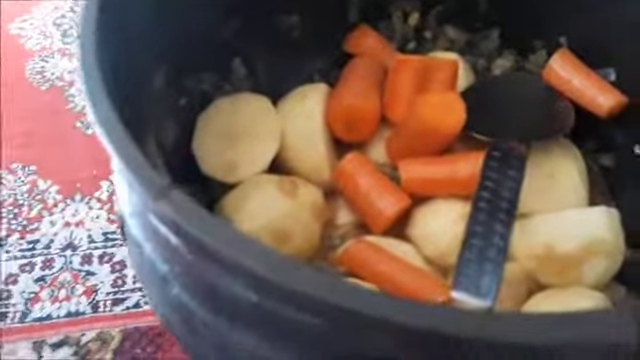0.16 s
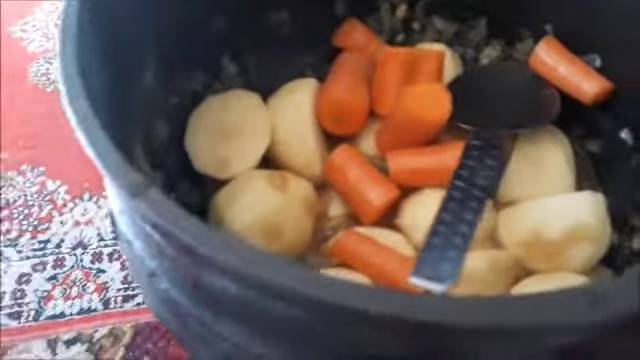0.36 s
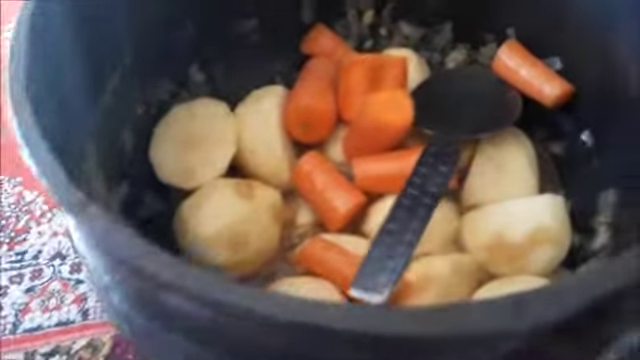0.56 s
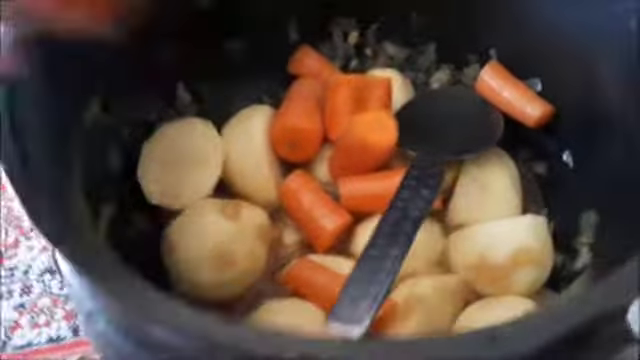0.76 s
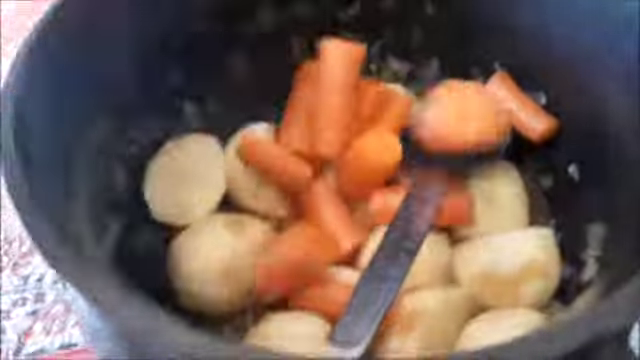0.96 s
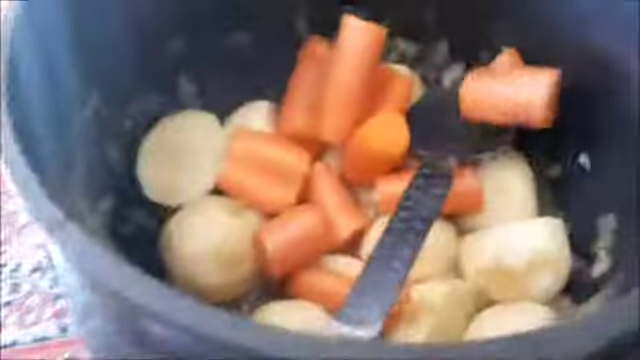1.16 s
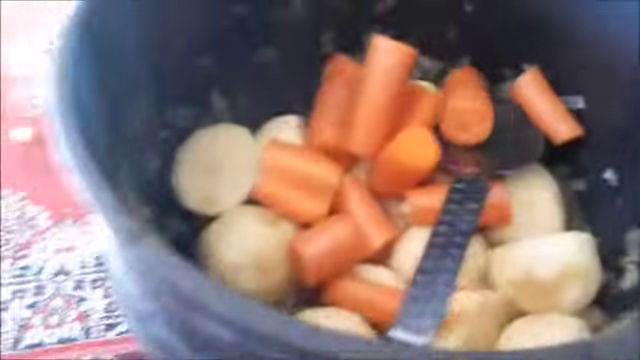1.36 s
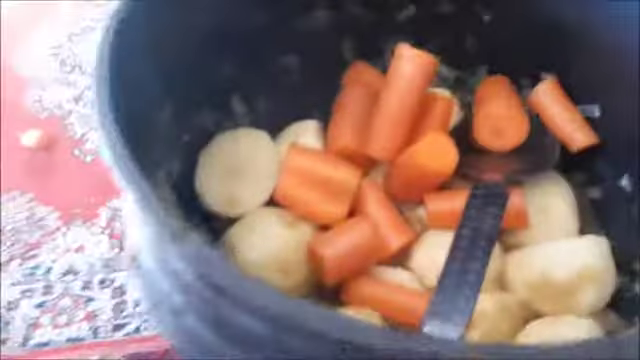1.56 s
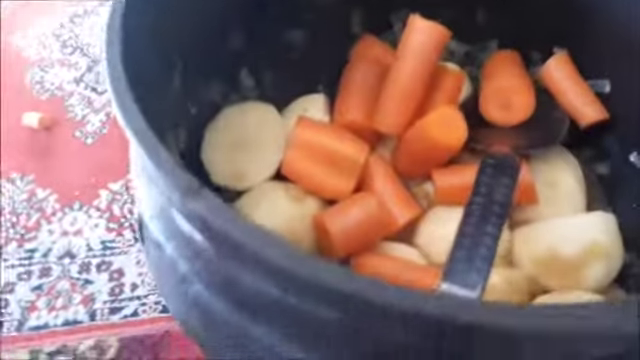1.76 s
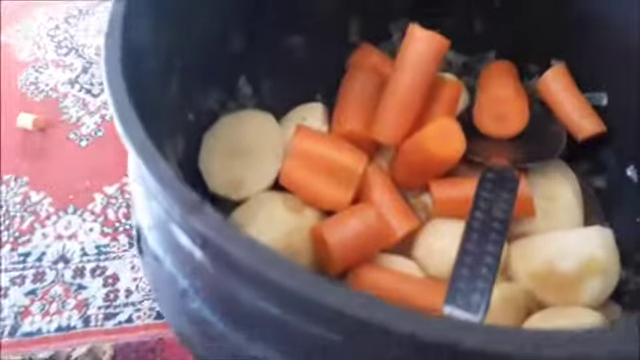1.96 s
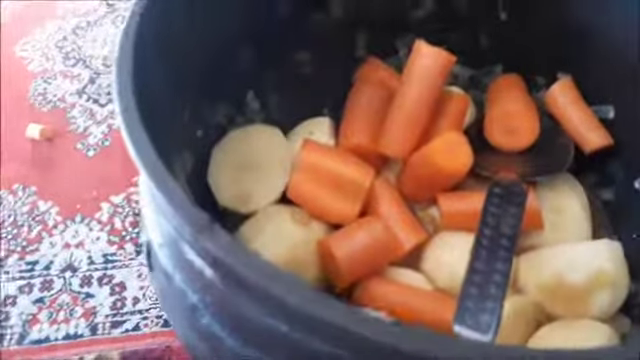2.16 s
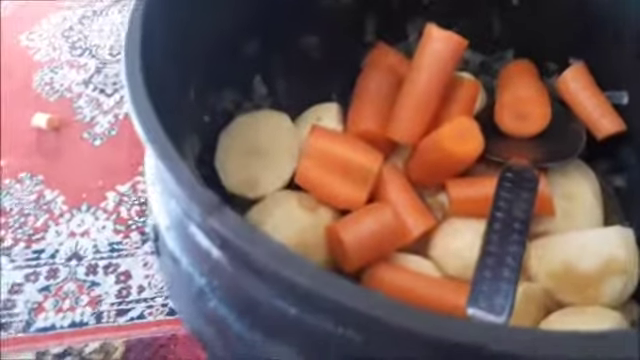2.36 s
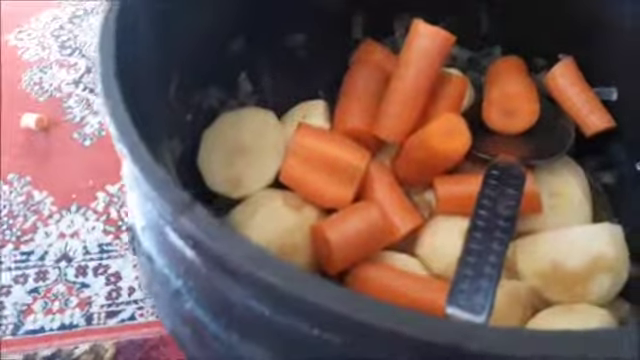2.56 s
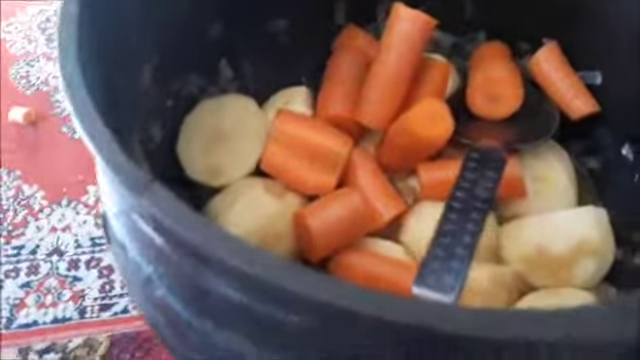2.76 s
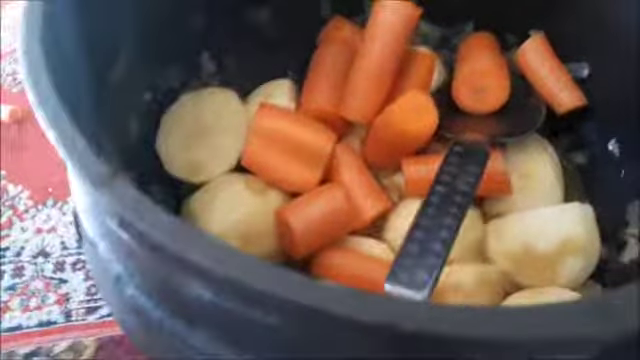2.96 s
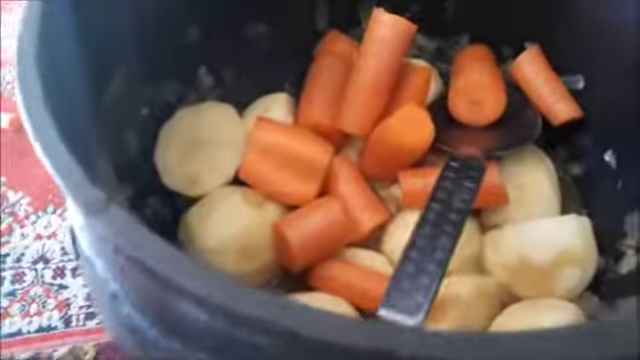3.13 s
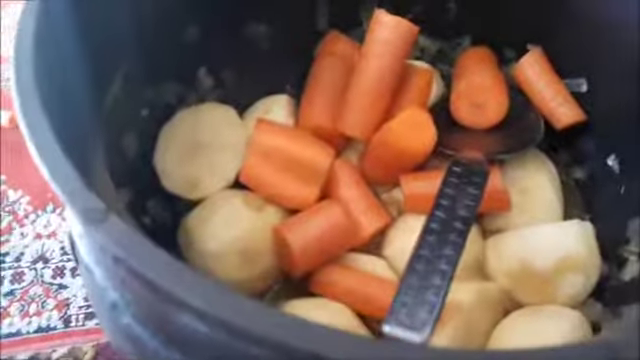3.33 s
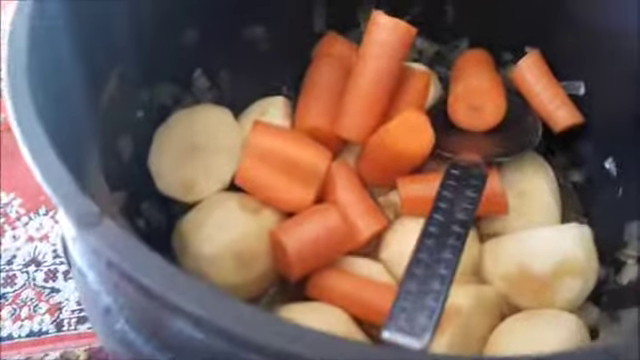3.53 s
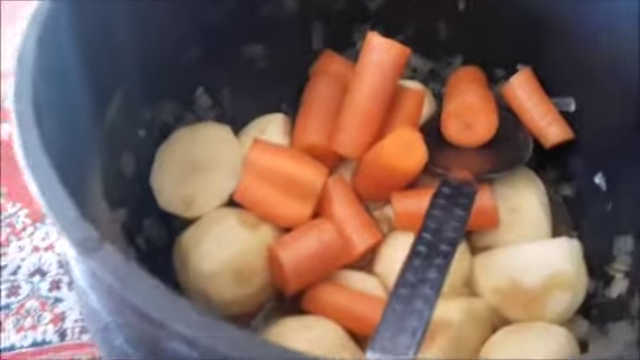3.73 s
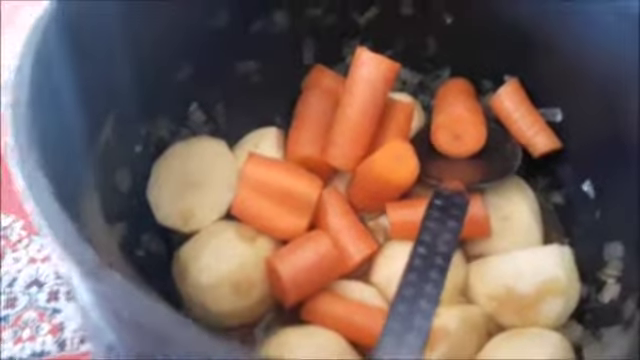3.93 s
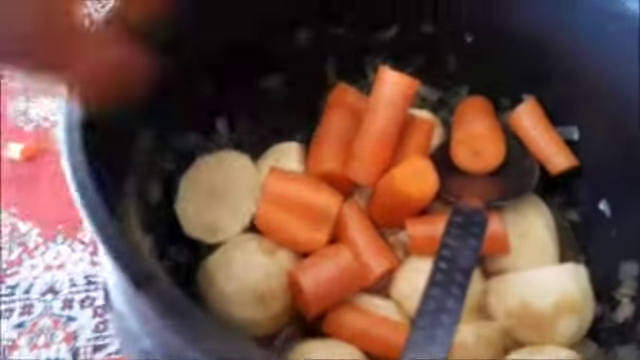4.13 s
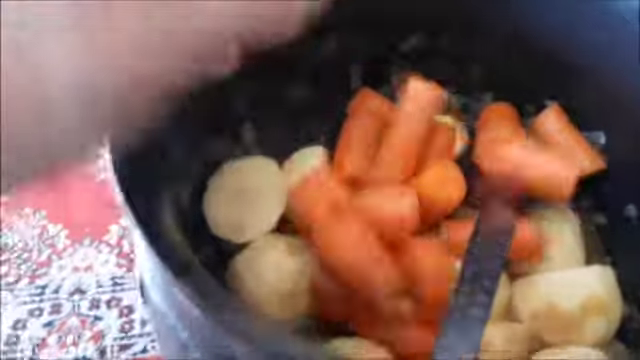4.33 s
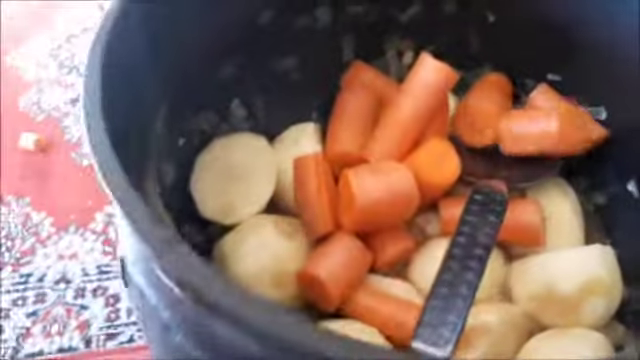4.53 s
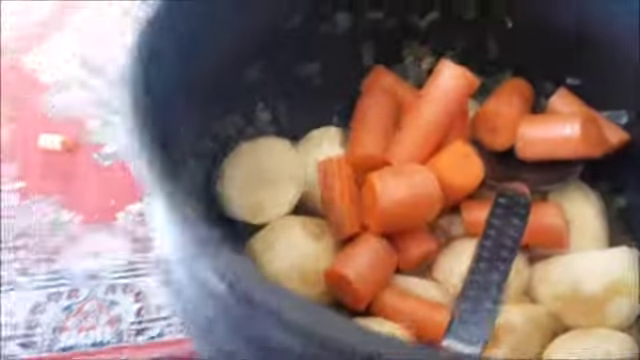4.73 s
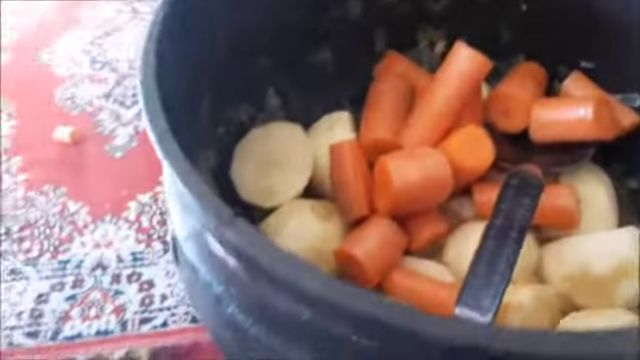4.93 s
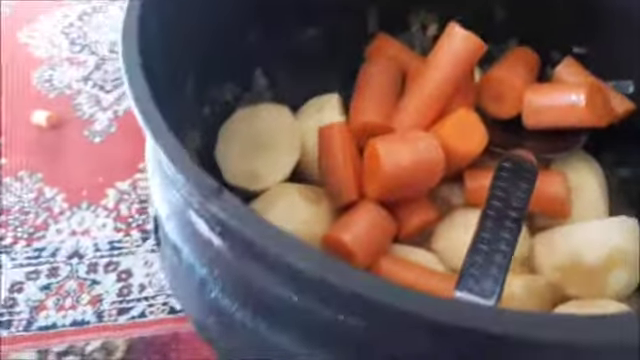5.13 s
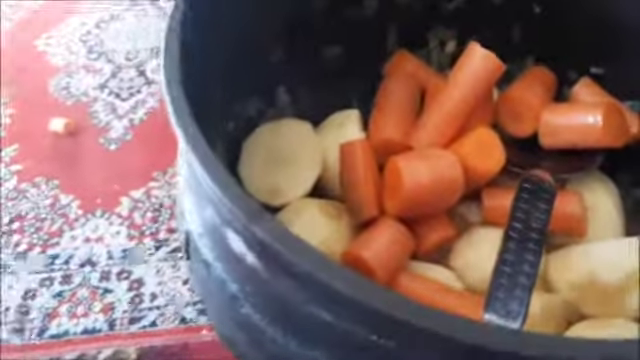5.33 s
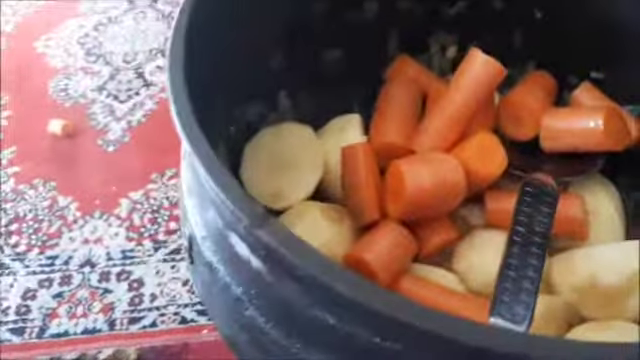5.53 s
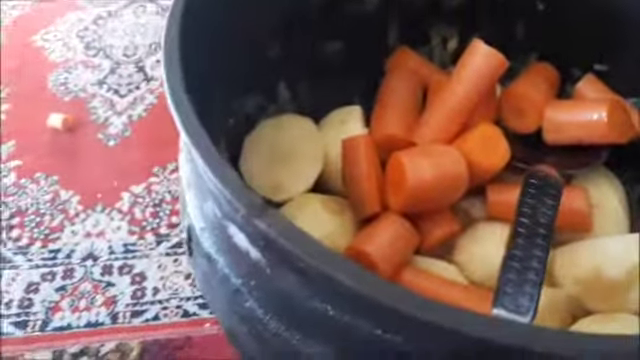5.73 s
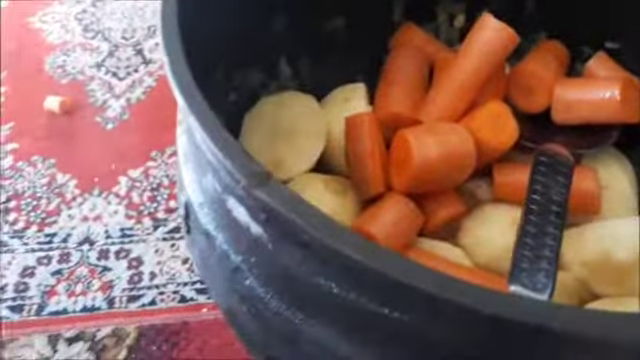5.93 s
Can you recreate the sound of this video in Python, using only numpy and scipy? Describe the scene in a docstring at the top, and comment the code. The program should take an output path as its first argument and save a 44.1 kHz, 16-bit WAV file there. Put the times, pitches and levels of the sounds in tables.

```python
"""A quiet yard opens the scene: steady airy hiss, muffled handling knocks and faint birds.
Then two handfuls of carrot chunks fall into a cast iron pot, onto potatoes and a metal spoon.
Chunks land with a dull thud of shaped noise; the spoon rattles on the iron as a burst of dense modes,
and the iron rings briefly as decaying sines. Faint sliding hiss follows the first handful.
The recorder's gain control drops at each clatter and lets the level creep back."""
import sys
import numpy as np
from scipy import signal
from scipy.fft import rfft, irfft
from scipy.io import wavfile
from scipy.ndimage import uniform_filter1d

SR = 44100
rng = np.random.default_rng(int(sys.argv[2]) if len(sys.argv) > 2 else 0)


def dump(signal):
    """Clip the signal to [-1, 1] and save it as 16-bit WAV at the path in sys.argv[1]."""
    limited = np.clip(np.atleast_2d(signal).T, -1, 1)
    pcm = np.round(limited * 32767).astype(np.int16)
    wavfile.write(sys.argv[1], SR, pcm)


N = 268569


def from_db(db):
    """Decibels to gain."""
    return 10 ** (np.asarray(db) / 20)


def unit(x):
    """Scales to an rms of 1."""
    return x / np.sqrt(np.mean(x ** 2) + 1e-20)


def spectrum(points, hz):
    """Reads (Hz, value) points on a log-frequency axis."""
    point_hz, value = np.transpose(points)
    return np.interp(np.log(hz + 1), np.log(point_hz), value)


def bell(hz, centre_hz, width_hz):
    """A smooth hump of height 1."""
    return np.exp(-((hz - centre_hz) / width_hz) ** 2)


def noise(size, colour):
    """Noise of rms 1 whose spectrum follows the gain colour(Hz)."""
    white = rfft(rng.standard_normal(size))
    return unit(irfft(white * colour(np.fft.rfftfreq(size, 1 / SR)), size))


def fade(t, rise_s, t60_s):
    """Builds up, then dies by 60 dB in t60_s."""
    return (1 - np.exp(-t / rise_s)) * from_db(-60 * t / t60_s)


def add(mix, start_s, sound):
    """Mixes a sound in at its start time."""
    part = mix[max(round(start_s * SR), 0):][:len(sound)]
    part += sound[:len(part)]


# broad colour of the yard air: frequency_hz, relative_level_db
YARD_COLOUR = [(25, -30.5), (60, -14), (102, -10.5), (250, 1), (363, -1.5), (520, -8.5), (1100, -7.5),
               (1300, -11.5), (2760, -16.5), (4300, -21.5), (7700, -27), (9900, -34), (13600, -30),
               (16000, -26.5)]
# narrow humps of hiss on top: centre_hz, half_width_hz, boost_db
YARD_HUMPS = [(369.4, 35, 7), (647, 64, -3.5), (2100, 66, 6), (3750, 230, 14), (8636, 450, 17.5),
              (9870, 420, -11)]


def yard(level_db=-52, waver_db=1.36):
    """Steady outdoor air: coloured noise with narrow humps, its level wavering a little."""
    def colour(hz):
        humps_db = sum(db * bell(hz, centre, width) for centre, width, db in YARD_HUMPS)
        return from_db(spectrum(YARD_COLOUR, hz) + humps_db)
    air = noise(N, colour)
    waver = noise(N, lambda hz: bell(hz, 0, 6.8))  # slow random drift
    return air * from_db(level_db + waver_db * waver)


# small knocks of handling: start_s, level_db (before the fade), t60_s, pitch_hz, pitch_boost_db
HANDLING_KNOCKS = [(0.042, -43, 0.36, 1670, 17.5), (0.068, -43.5, 0.67, 2120, 2),
                   (0.3821, -39, 0.039, 1800, 10), (0.395, -38, .25, 274, 12.5),
                   (0.795, -47, 0.36, 1673, 5), (0.943, -37.5, 0.045, 1144, 22.5),
                   (2.699, -48, .15, 905, 5), (5.981, -49, 0.59, 690, 6)]
# muffled colour shared by the knocks: frequency_hz, relative_level_db
KNOCK_COLOUR = [(40, -21), (130, -11.5), (210, -4), (320, 2), (430, -7), (650, -8.5), (1700, -17.5),
                (3000, -22.5), (9000, -28.5), (15000, -50)]


def bumps(width_hz=170, tick_share=.1, rise_share=0.013):
    """Muffled knocks of handling: noise with one soft resonance and a brief tick where it starts."""
    out, t = np.zeros(N), np.arange(SR // 2) / SR
    for start_s, level_db, t60_s, pitch_hz, boost_db in HANDLING_KNOCKS:
        def colour(hz):
            return from_db(spectrum(KNOCK_COLOUR, hz) + boost_db * bell(hz, pitch_hz, width_hz))
        rise_s = rise_share * t60_s  # longer knocks build up more slowly
        tick = .5 * fade(t, rise_s, t60_s * tick_share)
        add(out, start_s, from_db(level_db) * noise(len(t), colour) * (fade(t, rise_s, t60_s) + tick))
    return out


# far birds: start_s, length_s, mid_call_pitch_hz, level_db (at the top of the swell)
BIRD_CALLS = [(0.145, 0.11, 6430, -60), (0.742, 0.085, 4190, -57.5), (0.79, 0.11, 4850, -64),
              (1.47, .08, 5200, -56), (1.526, 0.087, 3960, -55), (1.61, .08, 5990, -62),
              (1.69, 0.087, 5000, -62.5), (1.775, 0.16, 8750, -57.5), (2.609, 0.33, 8970, -44.5),
              (2.711, 0.28, 8800, -46)]


def birds(blur_hz=290, sag_hz_per_s=394):
    """Short tones that sink in pitch, blurred into narrow bands by distance."""
    out = np.zeros(N)
    for start_s, length_s, pitch_hz, level_db in BIRD_CALLS:
        t = np.arange(int(length_s * SR)) / SR
        sinking_hz = pitch_hz - sag_hz_per_s * (t - length_s / 2)
        tone = np.sin(2 * np.pi * np.cumsum(sinking_hz) / SR)
        blurred = unit(tone * noise(len(t), lambda hz: bell(hz, 0, blur_hz)))
        swell = np.sin(np.pi * t / length_s)
        add(out, start_s, from_db(level_db) * blurred * swell)
    return out


def thud(t, level_db):
    """Firm flesh on firm flesh: a short low knock, then a soft boom of the air in the pot."""
    # only heavy chunks reach the bass: softer landings raise the corner
    corner_hz = 120 * from_db(np.clip(-14 - level_db, -10, 10))
    knock = noise(len(t), lambda hz: bell(hz, 330, 340) * hz ** 2 / (hz ** 2 + corner_hz ** 2))
    knock = knock * fade(t, 0.0016, .025)
    boom = noise(len(t), lambda hz: bell(hz, 290, 145)) * fade(t, 0.0082, .16)
    return from_db(level_db) * (knock + from_db(-16) * boom)


# crowds of short-lived modes in the hollow of the pot: centre_hz, half_width_hz, relative_level_db
MODE_CROWDS = [ (424, 91, -9.5), (807, 60, -15.5), (1377, 110, -3.5), (2026, 464, 2), (3690, 440, -0.5),
               (4363, 250, -2), (5350, 580, 1.5), (6300, 510, 0), (7850, 170, -4.5), (8656, 340, 7.5),
               (10020, 460, -1.5), (10700, 260, -5.5), (11960, 350, 2.5), (14000, 870, -3),
               (14700, 410, -13), ]


def hollow(hz, base_db=-17, knee_hz=1400):
    """Colour of the metal heard inside the pot; a small spoon radiates little bass."""
    spoon = from_db(base_db) * hz ** 2 / (hz ** 2 + knee_hz ** 2)
    return spoon + sum(from_db(db) * bell(hz, centre, width) for centre, width, db in MODE_CROWDS)


# how fast the clatter dies, before each blow's linger scales it: frequency_hz, t60_s
CLATTER_DECAY = [(300, 0.29), (1500, 0.17), (4000, 0.14), (9000, 0.12), (15000, 0.1)]


def clatter(t, spot, linger, uneven_db=6.5, patch_hz=420, rise_s=0.0013):
    """Dense modes that die fast; each blow feeds some regions more than others."""
    grid_hz = np.arange(0, SR / 2, patch_hz)
    patches_db = uneven_db * rng.standard_normal(len(grid_hz))

    def colour(hz):
        return spot(hz) * hollow(hz) * from_db(np.interp(hz, grid_hz, patches_db))
    # each frequency band decays at its own rate
    hz, at_s, bands = signal.stft(noise(len(t), colour), SR, nperseg=256)
    t60_s = linger * spectrum(CLATTER_DECAY, hz)[:, None]
    bands = bands * from_db(-60 * at_s / t60_s)
    return signal.istft(bands, SR, nperseg=256)[1][:len(t)] * (1 - np.exp(-t / rise_s))


# clear modes of the pot and spoon: pitch_hz, relative_level_db, t60_s
METAL_MODES = [ (485, -29, .6), (861, -22, .17), (1290, -23, .48), (1325, -15, .28), (2110, -14, .2),
               (2386, -12.5, .5), (3079, -18, .19), (3542, -14, .19), (3700, -16, .2), (4533, -9, .21),
               (5116, -4.5, .16), (5511, -4, .145), (5687, -9, .155), (6244, -13, .2), (6780, -12, .18),
               (7765, -12, .2), (7913, -15, .18), (8131, -14, .17), (8440, -7.5, .22), (8490, -9, .19),
               (8748, -12, .17), (8880, -5, .15), (9991, -10, .16), (10862, -9, .16), (11946, -6.5, .14),
               (12766, -11, .12), (13628, -12, .125), (14008, -9.5, .12), (14642, -11, .125),
               (15154, -9, .11), ]


def ring(t, spot, rise_s=.002):
    """Clear modes swell as the blow spreads through the metal; neighbours swing in opposite senses."""
    out = np.zeros(len(t))
    for k, (hz, level_db, t60_s) in enumerate(METAL_MODES):
        gain = (-1) ** k * from_db(level_db) * spot(hz)
        out += gain * np.sin(2 * np.pi * hz * t) * fade(t, rise_s, t60_s)
    return out


def shimmer(t, count=240, t60_at_1k_s=0.69, shortening=0.25):
    """The many weak overtones of the iron, the same for every blow: their Hz and their dying swings."""
    hz = np.linspace(1400, 15400, count) + rng.uniform(-25, 25, count)
    t60_s = t60_at_1k_s * (hz[:, None] / 1000) ** -shortening
    return hz, np.exp(2j * np.pi * hz[:, None] * t) * fade(t, 0.0033, t60_s)


def blow(t, overtone_hz, swings, ring_db, tilt_db, spot_hz=0, boost_db=0):
    """Every contact drives the same metal, coloured by how hard it is and where it lands."""
    def spot(hz, extra_tilt_db=0):
        octaves = np.log2((hz + 300) / 6500)
        return from_db((tilt_db + extra_tilt_db) * octaves + boost_db * bell(hz, spot_hz, 280))
    random_phase = rng.standard_normal((len(overtone_hz), 2)) @ [1, 1j]
    share = spot(overtone_hz) * hollow(overtone_hz) * random_phase
    overtones = (share @ swings).real / np.linalg.norm(share)
    # a chunk that mutes the ring also cuts the clatter short
    linger = from_db(0.31 * (ring_db + 2))
    # the heavy iron takes up the low part of a blow: its ring tilts 1 dB per octave darker
    modes = ring(t, lambda hz: spot(hz, -1))
    return clatter(t, spot, linger) + from_db(ring_db) * (modes + from_db(-18) * overtones)


# a chunk lands on other vegetables: start_s, thud_level_db
CHUNK_LANDINGS = [(0.979, -20), (0.996, -33.5), (1.015, -27), (1.026, -23), (1.101, -27.5), (1.324, -34.5),
                  (4.382, -21.5), (4.399, -23), (4.416, -10.5), (4.438, -30), (4.648, -37)]
# a chunk drives the spoon against the iron: start_s, clatter_level_db, ring_db (relative to the clatter),
# brightness_db_per_octave, spot_hz (pitch the struck spot favours), spot_boost_db
SPOON_STRIKES = [ (0.988, -20, -6, 3, 5750, 2), (1.015, -16, -6, 1, 4100, 9),
                 (1.031, -7.5, -16, 5, 8750, 9.5), (1.1065, -3, -9.5, 3, 8500, 4),
                 (1.122, -8, -7, 3.5, 4970, 17.5), (1.134, -6.5, -11, 5, 1333, 5.5),
                 (1.146, -9.5, -1, 2.5, 11950, 9.5), (1.156, -10.5, -13.5, 3, 6000, 5),
                 (1.176, -19.5, -1, 2, 11300, 12.5), (1.3265, -10, -8.5, 4, 5700, 4.5),
                 (1.384, -11.5, -15.5, 2.5, 6110, 13.5), (1.427, -36.5, -13.5, 5, 8400, 20),
                 (4.395, -1, -12.5, 3.5, 5380, 8), (4.413, -14, -12, -3.5, 2240, 8.5),
                 (4.4325, 0, -11, 7, 14330, 5.5), (4.449, -20, 0.5, -1, 1380, 7),
                 (4.470, -4.5, -4.5, 3, 8700, -5), (4.481, -10.5, -3, 5.5, 5620, 15.5),
                 (4.497, -14.5, -9.5, -2, 4660, 13), (4.515, -7, -23, 3, 8240, -3),
                 (4.651, 0, -10, 5, 5640, 3.5), ]
# the spoon's other end touches, then it drops back: delay_s (before scatter), level_db (re the strike)
SPOON_REBOUNDS = [(.006, -7), (.017, -18)]


def chunks():
    """Chunks thud onto the pile and jostle the metal, or strike the spoon, which rebounds twice."""
    jostle_db, jostle_ring_db, jostle_tilt_db = -9, -15.5, -2  # level re thud, ring, dB per octave
    rebound_ring_db = 3.5  # a rebounding spoon rings more freely
    dulling = 0.2359  # softer rebounds are duller: dB per octave lost with each dB
    scatter = .2  # share by which the rebound delays vary
    out, t = np.zeros(N), np.arange(SR // 2) / SR
    overtones = shimmer(t)
    for start_s, level_db in CHUNK_LANDINGS:
        jostle = from_db(level_db + jostle_db) * blow(t, *overtones, jostle_ring_db, jostle_tilt_db)
        add(out, start_s, thud(t, level_db) + jostle)
    for start_s, level_db, ring_db, tilt_db, *spot in SPOON_STRIKES:
        add(out, start_s, from_db(level_db) * blow(t, *overtones, ring_db, tilt_db, *spot))
        for delay_s, drop_db in SPOON_REBOUNDS:
            duller_db = tilt_db + dulling * drop_db
            metal = blow(t, *overtones, ring_db + rebound_ring_db, duller_db, *spot)
            touch_s = start_s + delay_s * (1 + scatter * rng.uniform(-1, 1))
            add(out, touch_s, from_db(level_db + drop_db) * metal)
    return out


# faint slides: start_s, length_s, level_db (at the top of the swell)
FAINT_SLIDES = [(2.595, 0.54, -59), (3.1, 0.14, -61.5)]
# colour of the sliding hiss: frequency_hz, relative_level_db
SLIDE_COLOUR = [(500, -4), (3500, -2), (6000, 0.5), (8800, 2), (10500, -1.5), (12000, -15), (16000, -7)]


def rustle(grain_db=1.5):
    """A faint grainy hiss of something sliding; each slide swells and fades."""
    level = np.zeros(N)
    for start_s, length_s, level_db in FAINT_SLIDES:
        swell = np.sin(np.linspace(0, np.pi, int(length_s * SR)))
        add(level, start_s, from_db(level_db) * swell)
    grain = from_db(grain_db * noise(N, lambda hz: bell(hz, 0, 90)))
    hiss = noise(N, lambda hz: from_db(spectrum(SLIDE_COLOUR, hz)))
    return level * grain * hiss


def scene():
    """The pot close by, the yard behind it."""
    return (yard() + bumps() + birds() + chunks() + rustle())[None]


def record(dry, threshold_db=-15, squeeze=0.59, recovery_db_per_s=9.5, edge_hz=15700):
    """Gain control that drops at once and recovers slowly, soft overload, then the band limit."""
    power_db = 10 * np.log10(abs(uniform_filter1d(dry[0] ** 2, size=180)) + 1e-12)
    # a running peak that sinks steadily: it jumps with each blow, then recovers
    climb_db = np.arange(N) / SR * recovery_db_per_s
    peak_db = np.maximum.accumulate(power_db + climb_db) - climb_db
    over_db = np.maximum(peak_db - threshold_db, 0)
    gain = from_db(-squeeze * uniform_filter1d(over_db, size=60))
    overloaded = np.tanh(dry * gain)
    low_pass = signal.firwin(401, edge_hz, window=("kaiser", 8), fs=SR)
    return signal.oaconvolve(overloaded, low_pass[None], "same")


dry = scene()
out = record(dry)
dump(out)
```